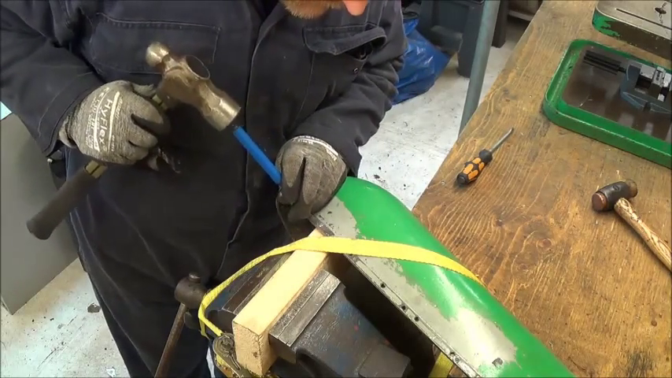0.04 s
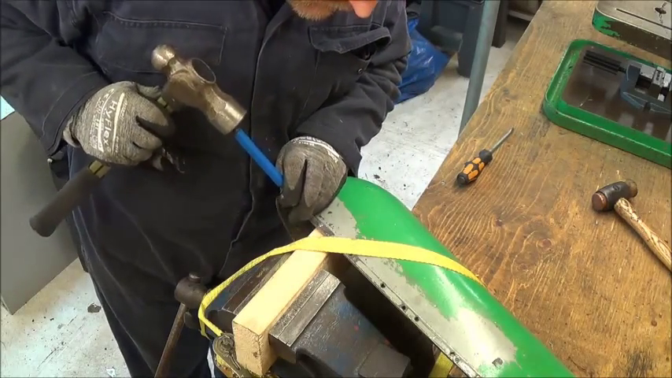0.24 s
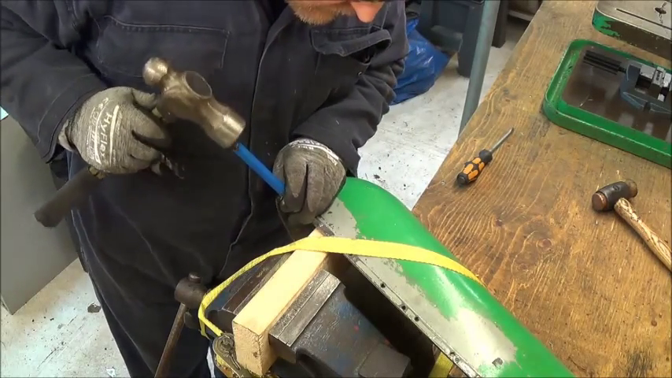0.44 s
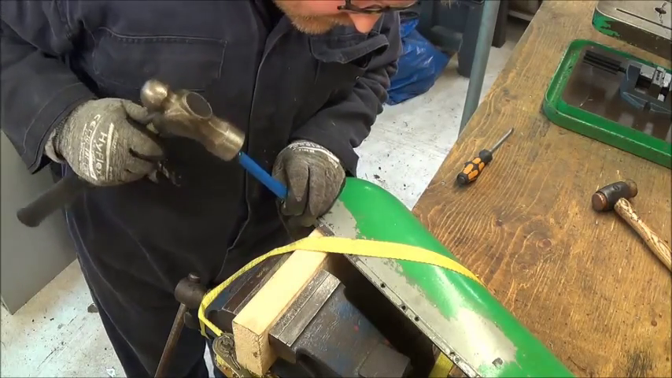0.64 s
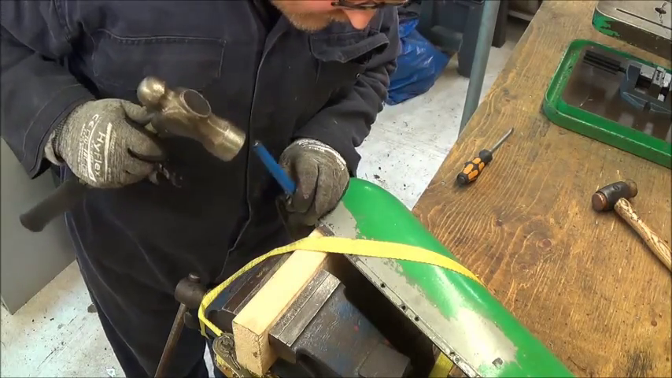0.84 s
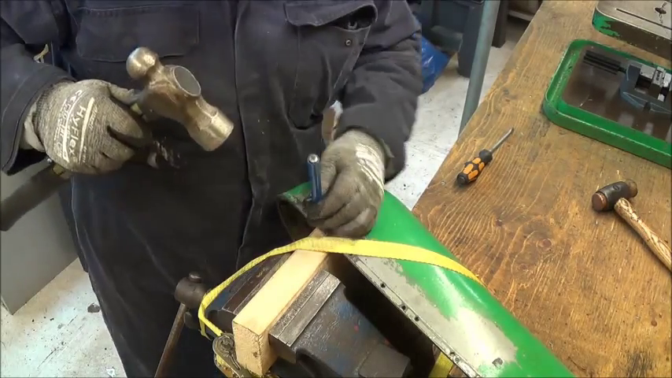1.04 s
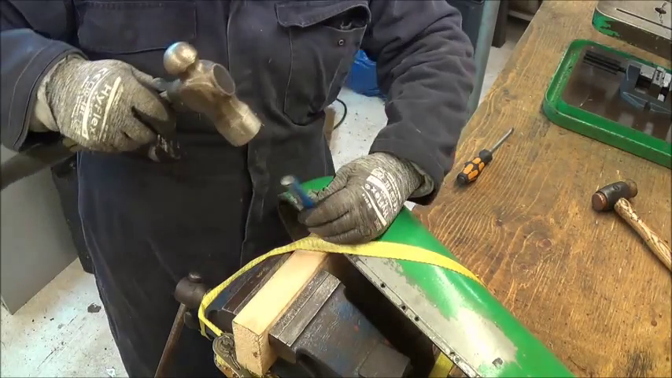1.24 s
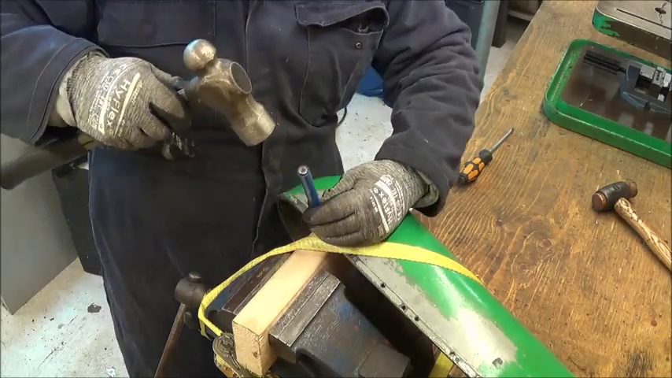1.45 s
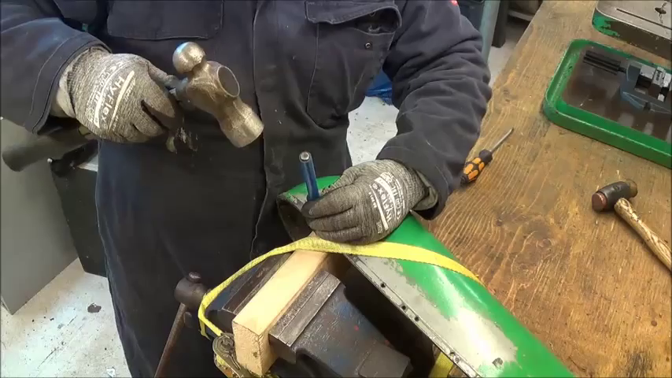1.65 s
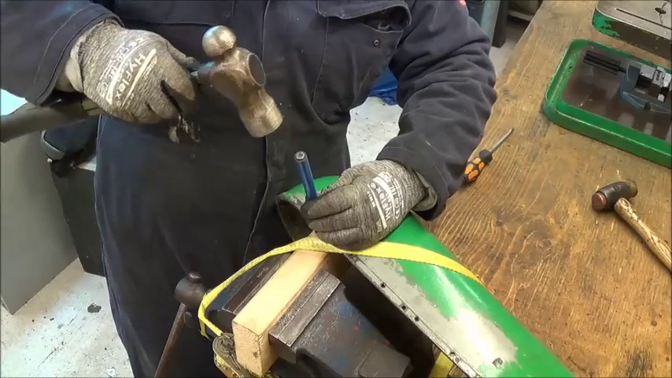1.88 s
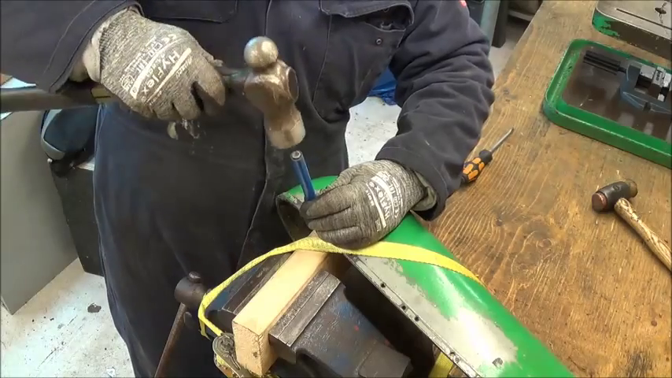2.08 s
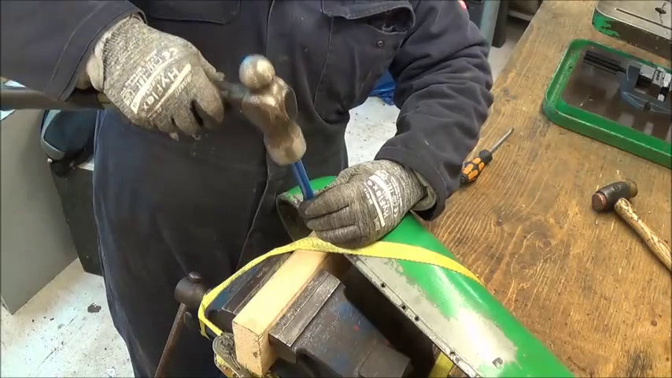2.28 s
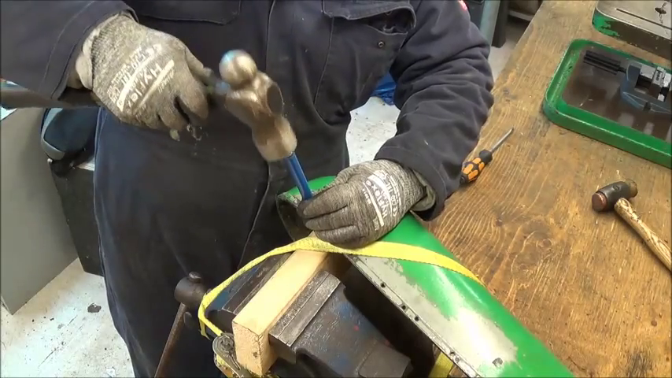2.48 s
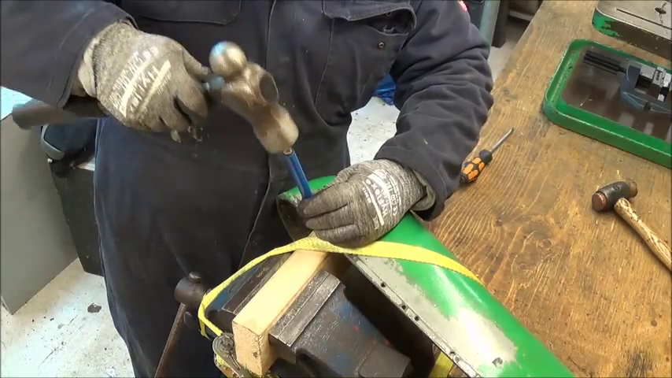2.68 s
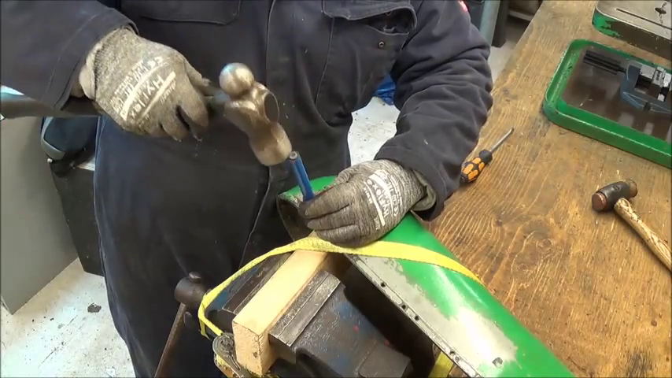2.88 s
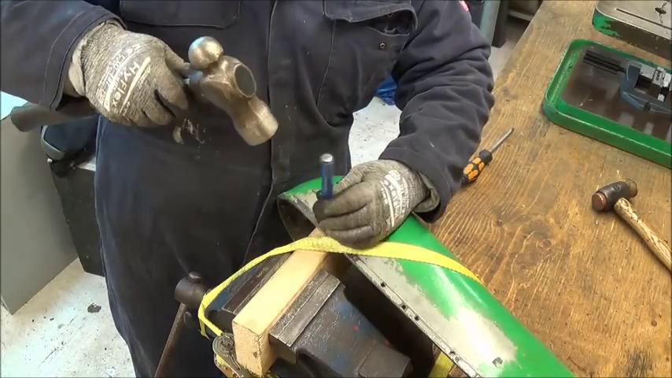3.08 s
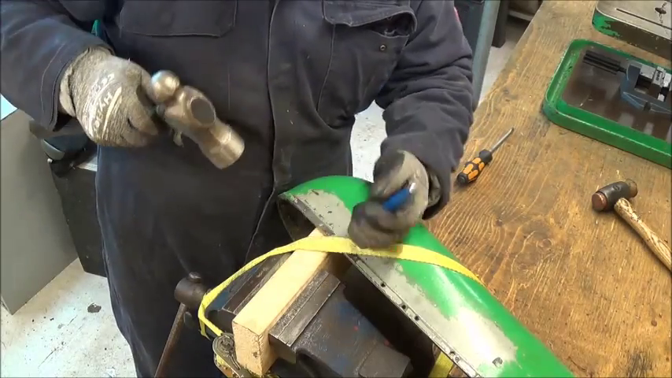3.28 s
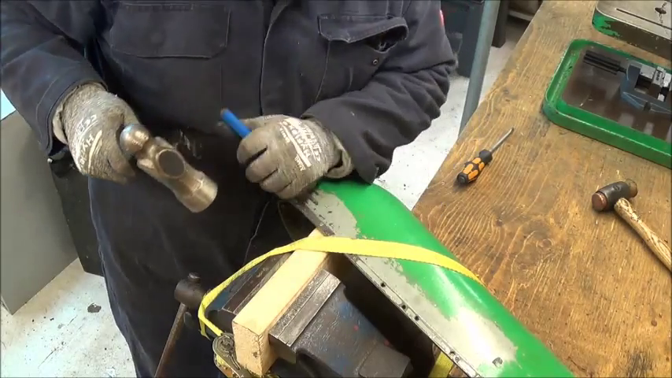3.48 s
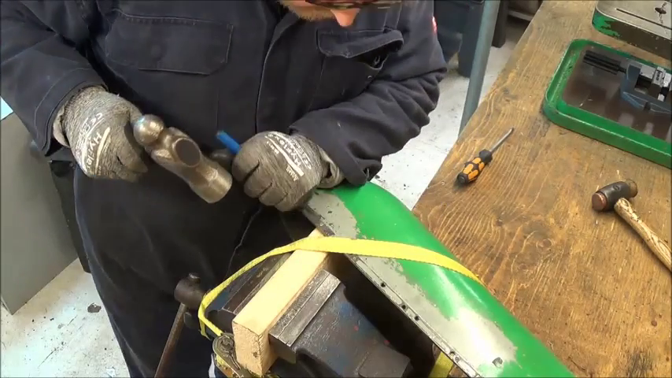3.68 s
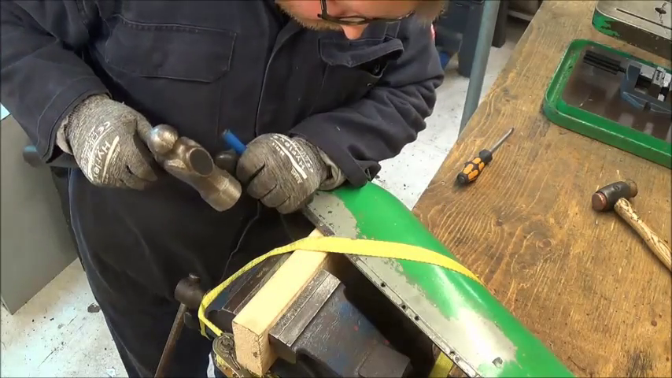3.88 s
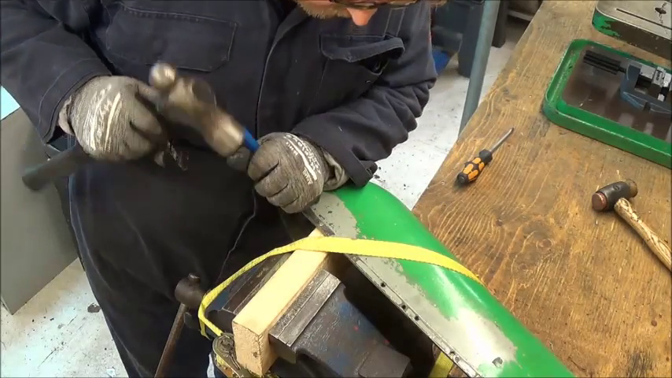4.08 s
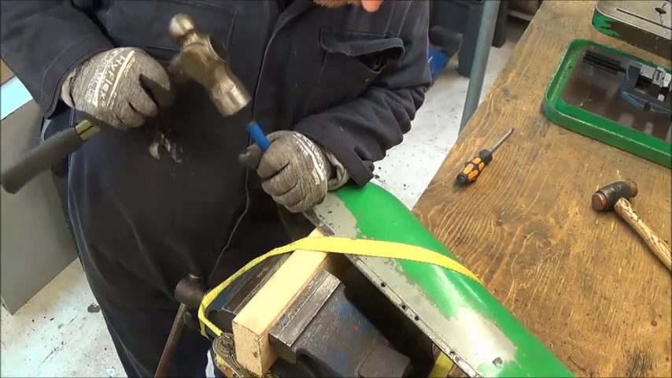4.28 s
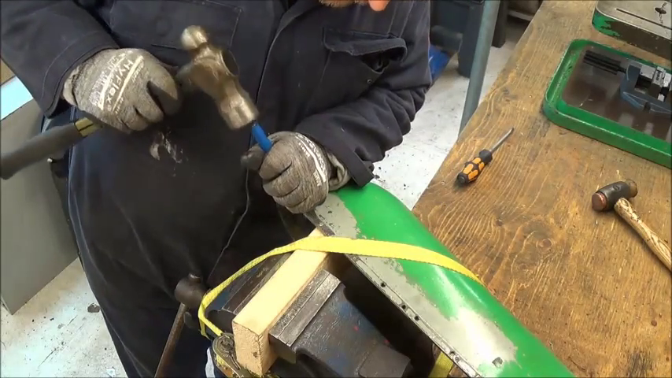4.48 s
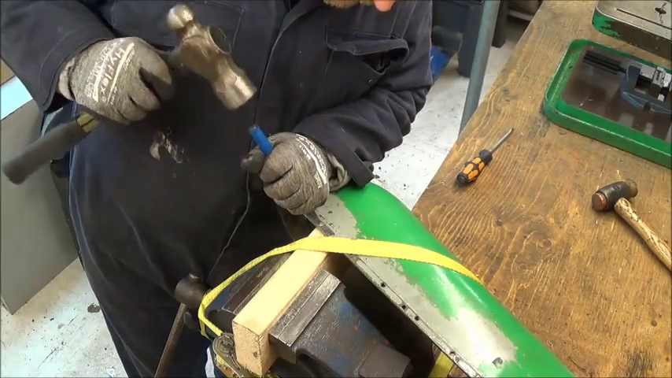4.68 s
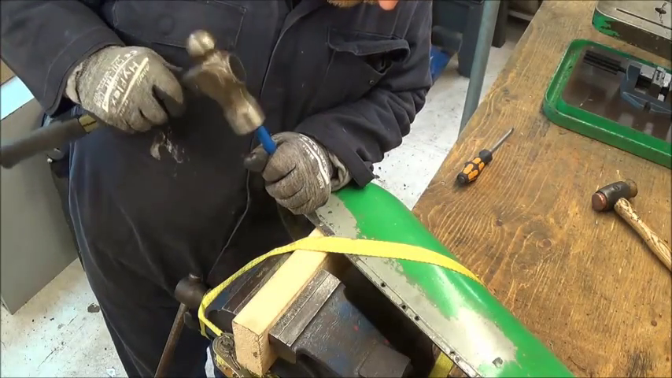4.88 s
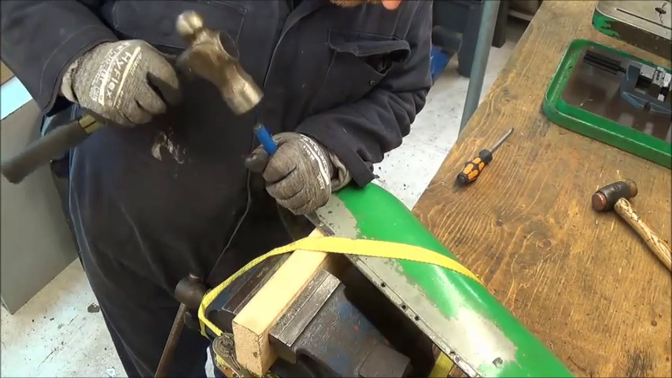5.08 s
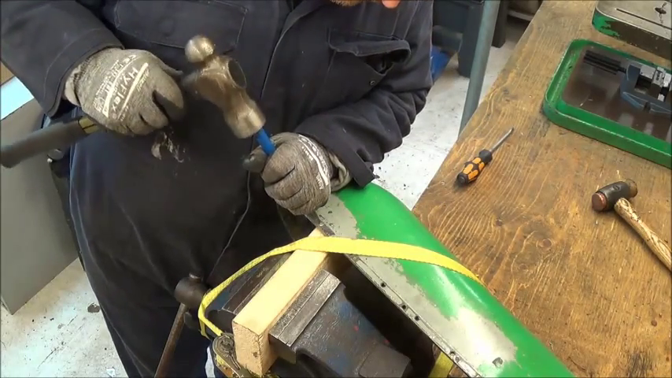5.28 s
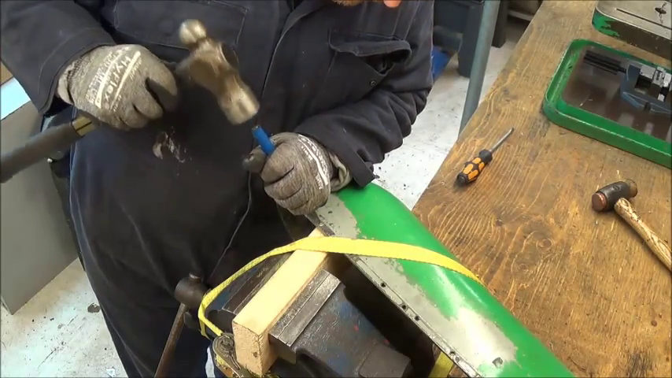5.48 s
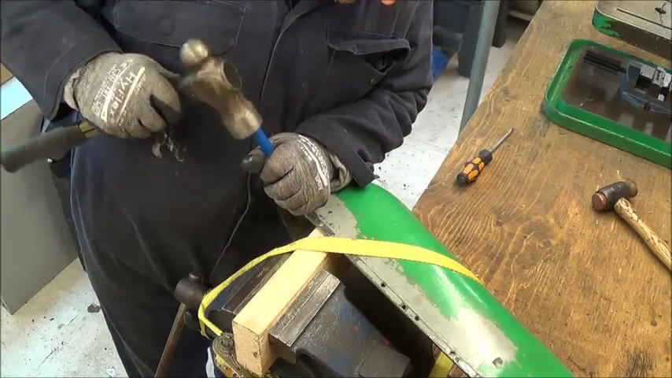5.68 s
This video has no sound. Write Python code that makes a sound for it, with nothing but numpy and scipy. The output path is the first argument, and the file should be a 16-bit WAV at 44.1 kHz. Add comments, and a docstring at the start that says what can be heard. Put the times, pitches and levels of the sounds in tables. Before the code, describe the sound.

A steel punch clinks lightly as it is set against a metal casing, then a small hammer taps it three times. The punch skids and knocks while being repositioned, and six quick, ringing blows follow. After a few more clinks comes a longer run of eleven even blows. The sound is close, in a small, fairly dead workshop with faint air noise and clothing rustle.

```python
"""A steel punch knocks on a metal casing strapped to a vice as it is set on a bolt end.
From 0.6 s a small hammer taps it 3 times; punch and casing ring, brighter as the punch beds in.
The punch skids and knocks as it is set again; 6 blows follow from 2.3 s. After more knocks and
a second skid come 11 blows from 4.3 s. Throughout: a small, fairly dead workshop, faint air, hum
and cloth; a limiter flattens the first hundredths of a second of each blow."""
import sys
import numpy as np
from scipy import signal
from scipy.fft import rfft, irfft
from scipy.io import wavfile
from scipy.ndimage import uniform_filter1d

SR = 44100
rng = np.random.default_rng(int(sys.argv[2]) if len(sys.argv) > 2 else 0)


def wrap_up_sound(samples):
    """Save the sound to the file named by the first command line argument, as 16-bit audio."""
    columns = np.atleast_2d(samples).T
    # keep every value between -1 and 1, then stretch to whole-number steps
    tamed = np.clip(columns, -1, 1)
    steps = np.round(tamed * 32767).astype(np.int16)
    wavfile.write(sys.argv[1], SR, steps)


N = 253134

# spectra of still air, work clothes and room tail: f/Hz, density/dB
AIR_SPECTRUM = [(18, -50), (30, -32), (81, 2), (145, -8), (203, -9), (258, -3.5), (1490, 0.5), (1660, -1.5),
                (2100, -0.5), (2590, -2.5), (3360, -1.5), (9860, -8), (14600, -9.5), (15800, -2)]
CLOTH_SPECTRUM = [(59, -26.5), (100, -20.5), (227, -12), (367, -3), (942, -7), (1810, -6.5), (3760, -7.5),
                  (15000, -13.5)]
ROOM_SPECTRUM = [(60, -11.5), (130, 2), (200, -2), (420, 3), (1000, -8.5), (2000, -12), (7000, -19.5),
                 (15000, -29.5)]
# sleeves and gloves moving: t/s, level/dB
CLOTH_ENVELOPE = [(0, -80), (1.0, -66), (1.5, -54.5), (3.1, -60.5), (3.55, -70), (3.75, -56), (4.2, -55),
                  (5.7, -76)]
# left-right likeness: f/Hz, coherence/1
STEREO_COHERENCE = [(200, .98), (400, .93), (700, .74), (1200, .66), (4000, .75), (9000, .77), (14000, .88)]
# strongest modes of casing, and of punch and steel it touches: f/Hz, blow/dB, knock/dB, t60/s
CASING_MODES = [(428, -22, -22, 0.33), (993, -15, -8, 0.2), (1039, -13, -20, 0.2), (1112, -16, -14, 0.2),
                (1214, -17, -3, 0.19), (1297, -11, -5, 0.16), (1723, -13, -2, 0.16), (1857, -10, -21, 0.15),
                (1927, -7, -6, 0.11), (2164, -14, -4, 0.14), (2231, -9, -4, 0.14), (2277, -11, -4, 0.13),
                (2527, -17, -7, 0.13), (2638, -10, -11, 0.15), (2791, -20, -5, 0.17), (2985, -7, -17, 0.12),
                (3513, -15, -12, 0.13), (3540, -8, -13, 0.11), (3714, -20, -8, 0.12), (3771, -6, -14, 0.1),
                (3943, -11, -17, 0.16), (4064, -15, -11, 0.15), (4169, -16, -7, 0.14),
                (4277, -7, -12, 0.13), (4323, -9, -14, 0.12), (4468, -19, -10, 0.13),
                (4541, -10, -16, 0.14), (4673, -16, -9, 0.14), (4767, -7, -16, 0.12),
                (4813, -16, -12, 0.19)]
STEEL_MODES = [(5098, -7, -18, 0.12), (5246, -12, -7, 0.13), (5294, -6, -16, 0.1), (5696, -12, -6, 0.18),
               (5814, -4, -18, 0.11), (6142, -7, -15, 0.12), (6393, -13, -10, 0.15), (6425, -6, -17, 0.15),
               (6460, -7, -22, 0.16), (6603, -9, -18, 0.19), (6635, -3, -12, 0.12), (6675, -7, -17, 0.14),
               (7181, 1, -15, 0.1), (7270, -4, -15, 0.1), (7321, -14, -9, 0.12), (7421, -3, -17, 0.12),
               (7456, 0, -15, 0.11), (7526, -4, -21, 0.11), (8150, -5, -20, 0.11), (8226, -2, -19, 0.14),
               (9324, -5, -12, 0.13), (9359, -2, -14, 0.1), (9405, -5, -19, 0.11), (10096, -10, -35, 0.13),
               (10188, -7, -32, 0.1), (10950, -13, -26, 0.12), (11426, -15, -25, 0.13),
               (12635, -13, -26, 0.12), (14104, -13, -32, 0.12), (14591, -16, -35, 0.13)]
# decay of the crowd of weaker modes: f/Hz, t60/s
CROWD_DECAY = [(100, 0.33), (400, 0.2), (1000, 0.16), (2500, 0.15), (7000, 0.14), (15000, 0.15)]
# crowd spectrum under a knock, under a blow: f/Hz, density/dB
KNOCK_SPECTRUM = [(40, -39), (130, -46.5), (220, -52), (400, -38.5), (900, -22), (1500, -17.5),
                  (3000, -17.5), (4500, -26), (6000, -25), (9000, -27.5), (11500, -25.5), (15500, -36)]
BLOW_SPECTRUM = [(40, -45.5), (130, -32.5), (220, -35.5), (400, -28.5), (800, -28.5), (1500, -15),
                 (3000, -14.5), (6000, -14), (9000, -9.5), (11500, -19.5), (15500, -24.5)]
# mode groups standing out of those spectra: f/Hz, width/Hz, gain/dB
KNOCK_PEAKS = [(203, 26, 13.0), (308, 124, 13.0), (427, 51, 10.3), (564, 50, 7.2), (783, 60, 8.3),
               (984, 109, 13.0), (1240, 259, 13.0), (1729, 78, 10.3), (2284, 568, 9.8), (2817, 108, 8.4),
               (4203, 599, 8.5), (4920, 599, 8.8), (5669, 398, 13.0), (6098, 104, 7.8), (6509, 437, 9.4),
               (7372, 369, 13.0), (8341, 326, 9.4), (9339, 371, 13.0)]
BLOW_PEAKS = [(289, 73, 8.4), (450, 184, 13.0), (658, 110, 12.6), (783, 63, 13.0), (990, 181, 13.0),
              (1091, 408, 8.0), (1298, 49, 7.0), (1709, 69, 7.5), (1915, 204, 10.2), (2235, 140, 8.6),
              (2661, 383, 4.9), (2989, 73, 6.7), (3535, 98, 5.2), (3796, 150, 6.5), (4279, 74, 6.3),
              (4603, 599, 3.9), (5749, 599, 7.7), (6585, 325, 6.7), (7173, 142, 9.9), (7480, 233, 11.0),
              (8248, 216, 9.2), (9359, 277, 8.2), (10137, 260, 4.7), (14117, 599, 3.7)]
# weighting of the strongest modes under a blow: f/Hz, gain/dB
BLOW_MODE_EQ = [(430, 1), (1000, -3), (5000, 2), (11000, -3)]
# punch set against the casing: t/s, level/dB, tilt/(dB/octave)
PUNCH_KNOCKS = [(0.017, -18, -1), (0.086, -30.5, -1.5), (0.124, -34.5, -5), (0.157, -26, -1.9),
                (0.21, -35.5, -6), (0.231, -35.5, -1.5), (0.992, -35.5, -0.5), (1.344, -25.5, 0.5),
                (1.5603, -11.5, -2), (1.608, -25, -1), (1.657, -30.5, -7.5), (1.853, -17, -6),
                (1.913, -25.5, -4.5), (3.128, -28, -0.6), (3.338, -35.5, -5), (3.5, -47.5, 7.5),
                (3.821, -16.5, 1), (4.035, -27, -0.5)]
# tip skidding on the casing wall: t/s, length/s, final level/dB, tilt/(dB/octave)
PUNCH_SKIDS = [(1.257, 0.017, -11, -1), (3.9, 0.058, -31.5, -4)]
# seated punch tone per run: from t/s, edge near 10 kHz/dB, treble over 11 kHz/dB
RUN_TONES = [(0.5, -1.5, 1), (2.2, -2.5, 3.5), (4.2, 4, 3.5)]
# hammer on punch: t/s, level/dB
HAMMER_BLOWS = [(0.577, -6.5), (0.7041, -4.5), (0.8244, -5.5), (2.2615, -1.5), (2.3925, -3.5),
                (2.526, -2.5), (2.6653, -2.5), (2.8083, -3.5), (2.9547, -4), (4.2977, -6), (4.431, -4.5),
                (4.557, -3), (4.69, -1), (4.8273, -2.5), (4.957, -4), (5.0921, -4), (5.2288, -4.5),
                (5.3706, -4), (5.511, -4), (5.6454, -4.5)]

RING_SAMPLES = 16384
AGE_S = np.arange(RING_SAMPLES) / SR


def from_db(db):
    """Decibels to gain."""
    return 10 ** (np.asarray(db) / 20)


def at_hz(points, hz):
    """Read a table along log frequency."""
    known_hz, values = np.transpose(points)
    return np.interp(np.log(np.maximum(hz, 1)), np.log(known_hz), values)


def bins_hz(size):
    """Spectrum frequencies for size samples."""
    return np.arange(size // 2 + 1) * SR / size


def add(track, t_s, sound):
    """Mix a sound in at t_s."""
    start = max(round(t_s * SR), 0)
    track[:, start:start + sound.shape[1]] += sound[:, :N - start]


def panned(x, right_db):
    """Right louder than left by right_db."""
    return x * from_db([[-right_db / 2], [right_db / 2]])


def noise_spectrum(colour, size, peaks=()):
    """Spectrum of coloured stereo noise, rms 1; sides most alike in the bass."""
    hz = bins_hz(size)
    mid, side = rfft(rng.standard_normal((2, size)))
    alike = np.clip(at_hz(STEREO_COHERENCE, hz), 0, 1)
    peaks_db = sum(db / (1 + (2 * (hz - peak_hz) / width_hz) ** 2) for peak_hz, width_hz, db in peaks)
    gain = from_db(at_hz(colour, hz) + peaks_db)
    pair = np.sqrt((1 + alike) / 2) * mid + np.sqrt((1 - alike) / 2) * side * [[1], [-1]]
    return pair * gain / np.sqrt(np.mean(gain ** 2))


def background(air_db=-56.5, hum_hz=191, hum_db=-80):
    """Still air, rustling work clothes, faint mains hum."""
    t_s = np.arange(N) / SR
    air = from_db(air_db) * irfft(noise_spectrum(AIR_SPECTRUM, N), N)
    cloth_db = np.interp(t_s, *np.transpose(CLOTH_ENVELOPE))
    cloth = from_db(cloth_db) * irfft(noise_spectrum(CLOTH_SPECTRUM, N), N)
    hum = from_db(hum_db) * np.sqrt(2) * np.sin(2 * np.pi * hum_hz * t_s)
    return air + cloth + hum


def workshop(x, room_db=-30.5, t60_s=0.52, build_s=0.016):
    """Faint, dull tail from benches and walls."""
    envelope = (1 - np.exp(-AGE_S / build_s)) * from_db(-60 * AGE_S / t60_s)
    tail = irfft(noise_spectrum(ROOM_SPECTRUM, RING_SAMPLES)) * envelope
    tail /= np.sqrt(np.sum(tail ** 2) / 2)
    return from_db(room_db) * signal.fftconvolve(x.mean(axis=0)[None], tail, axes=1)[:, :N]


def ring_envelope(hz, t60_s, contact_s, build_cycles=7.23):
    """Vibration builds during contact, low modes later, then decays."""
    rise_s = contact_s + build_cycles / hz
    return (1 - np.exp(-AGE_S / rise_s)) * from_db(-60 * AGE_S / t60_s)


def contact_spot(spread_db):
    """Each spot touched favours some frequencies, starves others: f/Hz, gain/dB."""
    hz = np.arange(100, SR / 2, 170)
    return np.transpose([hz, spread_db * rng.standard_normal(len(hz))])


def mode_phases(count, spread_rad=0.29):
    """Each mode reaches left and right with its own phase."""
    return rng.uniform(0, 2 * np.pi, count) + spread_rad * rng.standard_normal(count) * [[1], [-1]]


def mode_crowd(shared, fresh, tone_db, contact_s, damping=1):
    """Countless overlapping modes in 7 bands; part of the pattern is fresh at each contact."""
    hz, centres_hz = bins_hz(RING_SAMPLES), np.geomspace(120, 14000, 7)
    spectrum = (0.8 * shared + 0.6 * fresh) * from_db(tone_db(hz))
    out = 0
    for centre_hz, weights in zip(centres_hz, np.eye(len(centres_hz))):
        band = irfft(spectrum * at_hz(np.transpose([centres_hz, weights]), hz))
        t60_s = at_hz(CROWD_DECAY, centre_hz) / damping
        out = out + band * ring_envelope(centre_hz, t60_s, contact_s)
    return out


def clear_modes(hz, level_db, t60_s, phases, tone_db, contact_s, scatter_db=0.0):
    """The strongest modes ring as decaying sines."""
    gain = from_db(level_db + tone_db(hz) + scatter_db * rng.standard_normal(hz.shape))
    envelope = gain * ring_envelope(hz, t60_s, contact_s)
    angle = (2 * np.pi * hz * AGE_S).astype(np.float32)
    return np.cos(phases) @ (envelope * np.sin(angle)) + np.sin(phases) @ (envelope * np.cos(angle))


def skid_touches(count=5, jitter=0.03, swell_db=7, ring_db=1):
    """The tip skids in uneven, swelling knocks until it catches; held on the wall, it rings less."""
    touches = []
    for start_s, length_s, final_db, tilt_db_oct in PUNCH_SKIDS:
        for along in np.linspace(0, 1, count):
            t_s = start_s + length_s * (along + jitter * rng.standard_normal())
            touches.append((t_s, final_db - swell_db * (1 - along) ** 2, tilt_db_oct, ring_db))
    return touches


def punch_knocks(crowd_db=3.0, modes_db=-13.0, knock_ring_db=4, crowd_damping=1.83, mode_damping=1.48,
                 firm_db=-13.5, firm_contact_s=0.00079, doubling_db=9.5):
    """The punch clinks and skids on the casing, damped by a gloved hand; lighter contacts last longer."""
    hz, _, mode_db, t60_s = np.vstack([CASING_MODES, STEEL_MODES]).T[:, :, None]
    mode_db = mode_db + at_hz([(1000, -3.0), (1250, 0)], hz)   # a light touch stirs low modes less
    bite_eq = [(2500, 0), (4400, 2.5), (6500, 0)]
    shared = noise_spectrum(KNOCK_SPECTRUM, RING_SAMPLES, KNOCK_PEAKS)
    phases = mode_phases(len(hz))
    touches = [(*knock, knock_ring_db) for knock in PUNCH_KNOCKS] + skid_touches()
    out = np.zeros((2, N))
    for t_s, level_db, tilt_db_oct, ring_db in touches:
        spot_eq = contact_spot(spread_db=4.0)
        contact_s = firm_contact_s * 2 ** ((firm_db - level_db) / doubling_db)

        def tone_db(f_hz):
            octaves = np.log2(np.clip(f_hz, 1000, 12000) / 3000)
            return tilt_db_oct * octaves + at_hz(bite_eq, f_hz) + at_hz(spot_eq, f_hz)

        fresh = noise_spectrum(KNOCK_SPECTRUM, RING_SAMPLES, KNOCK_PEAKS)
        clash = mode_crowd(shared, fresh, tone_db, contact_s, crowd_damping)
        ring = clear_modes(hz, mode_db, t60_s / mode_damping, phases, tone_db, contact_s, scatter_db=1.5)
        knock = from_db(crowd_db - ring_db) * clash + from_db(modes_db + ring_db) * ring
        add(out, t_s, from_db(level_db) * knock)
    return panned(out, right_db=0.5)


def seated_blows(loose_edge_db=-7.5, loose_treble_db=-5, seating_s=0.091):
    """A loose punch sounds dull until blows drive it in: t/s, level/dB, edge/dB, treble/dB."""
    rows = []
    ends_s = [run[0] for run in RUN_TONES[1:]] + [np.inf]
    for (start_s, edge_db, treble_db), end_s in zip(RUN_TONES, ends_s):
        run = [blow for blow in HAMMER_BLOWS if start_s <= blow[0] < end_s]
        for t_s, level_db in run:
            loose = np.exp(-(t_s - run[0][0]) / seating_s)
            rows.append((t_s, level_db, edge_db + loose * loose_edge_db,
                         treble_db + loose * loose_treble_db))
    return rows


def hammer_blows(crowd_db=1.5, modes_db=-12.0, casing_db=-0.29, contact_s=0.0001, mode_damping=0.86):
    """The hammer drives the punch onto the bolt; the whole casing rings."""
    hz, mode_db, _, t60_s = np.vstack([CASING_MODES, STEEL_MODES]).T[:, :, None]
    mode_db = mode_db + at_hz(BLOW_MODE_EQ, hz)
    shared = noise_spectrum(BLOW_SPECTRUM, RING_SAMPLES, BLOW_PEAKS)
    phases = mode_phases(len(hz))
    out = np.zeros((2, N))
    for t_s, level_db, edge_db, treble_db in seated_blows():
        seating_eq = [(2200, casing_db), (3600, 0), (8200, 0),
                      (9600, edge_db), (10400, edge_db), (11200, treble_db)]
        spot_eq = contact_spot(spread_db=0.88)
        tone_db = lambda f_hz: at_hz(seating_eq, f_hz) + at_hz(spot_eq, f_hz)
        fresh = noise_spectrum(BLOW_SPECTRUM, RING_SAMPLES, BLOW_PEAKS)
        clash = mode_crowd(shared, fresh, tone_db, contact_s)
        ring = clear_modes(hz, mode_db, t60_s / mode_damping, phases, tone_db, contact_s)
        blow = from_db(crowd_db) * clash + from_db(modes_db) * ring
        add(out, t_s, from_db(level_db) * blow)
    return out


def scene():
    """Work close by, slightly to the right."""
    metal = hammer_blows() + punch_knocks()
    return panned(metal + workshop(metal), right_db=0.83) + background()


def limiter(x, threshold_db=-11.0, release_db_per_s=409.0, window_s=0.0014, attack_s=0.000057):
    """Cuts loud sound within a millisecond, releases quickly."""
    power = uniform_filter1d(np.mean(x ** 2, axis=0), int(window_s * SR))
    level_db = 10 * np.log10(np.abs(power) + 1e-12)
    excess_db = np.maximum(level_db - threshold_db, 0)
    release_db = release_db_per_s * np.arange(N) / SR
    cut_db = np.maximum.accumulate(excess_db + release_db) - release_db
    lag = np.exp(-1 / (attack_s * SR))   # the first crack slips through
    return x * from_db(-signal.lfilter([1 - lag], [1, -lag], cut_db))


def record(dry, ceiling=1.19, low_cut_hz=63.0, high_cut_hz=15800):
    """Bass cut, limiter, soft clip, steep top cut."""
    thin = signal.sosfilt(signal.butter(2, low_cut_hz, "high", fs=SR, output="sos"), dry)
    rounded = ceiling * np.tanh(limiter(thin) / ceiling)
    return signal.sosfilt(signal.ellip(10, 0.1, 80, high_cut_hz, fs=SR, output="sos"), rounded)


dry = scene()
out = record(dry)
wrap_up_sound(out)
```